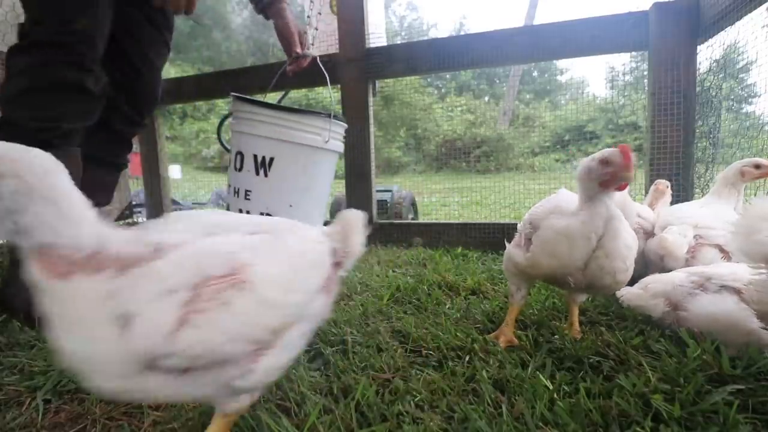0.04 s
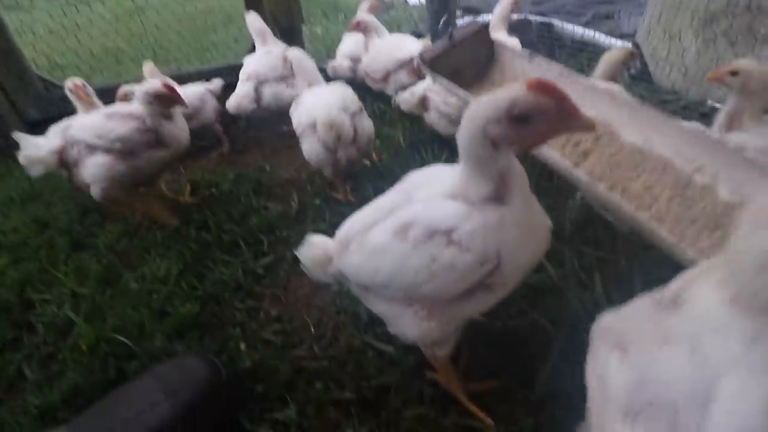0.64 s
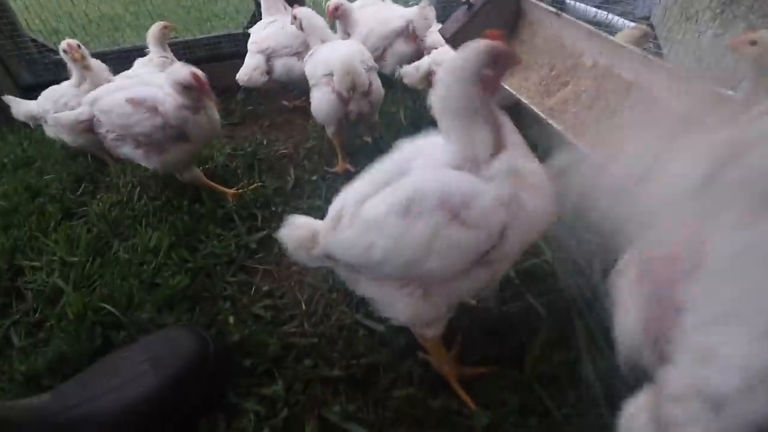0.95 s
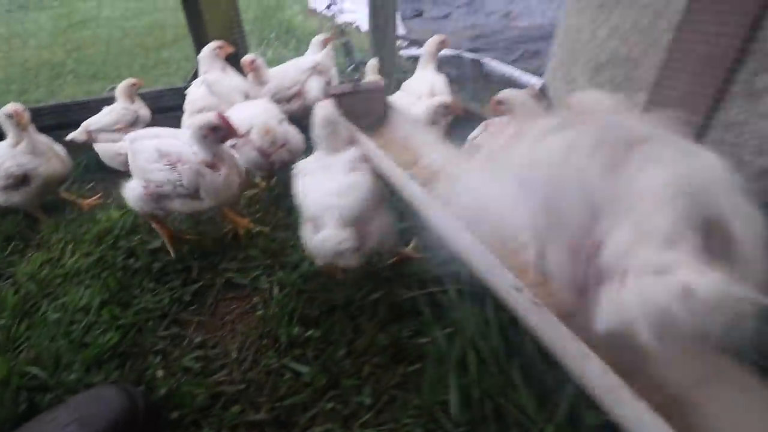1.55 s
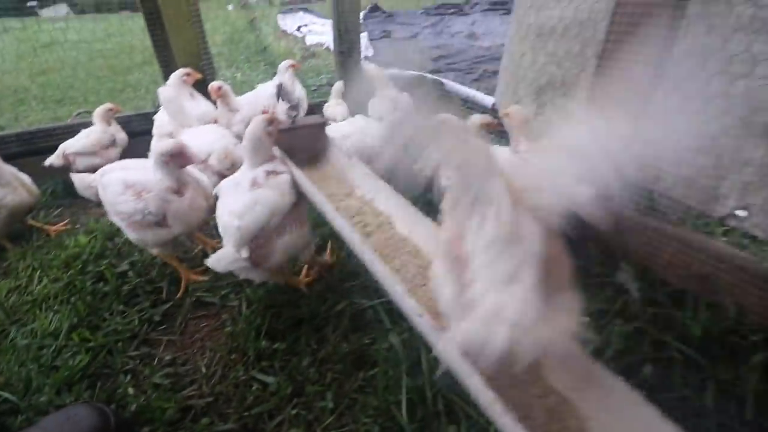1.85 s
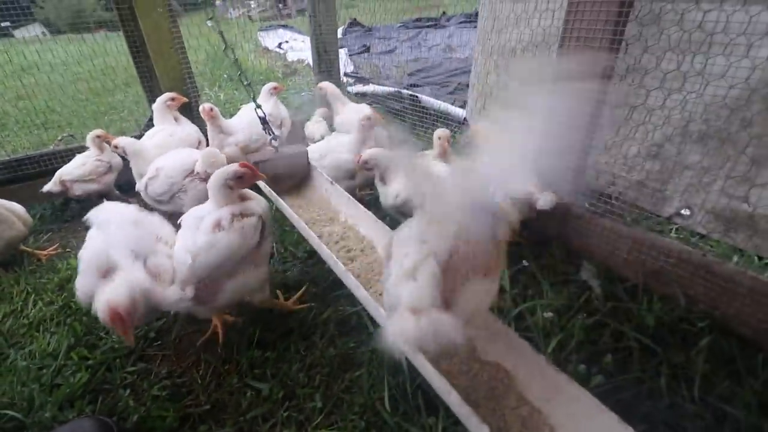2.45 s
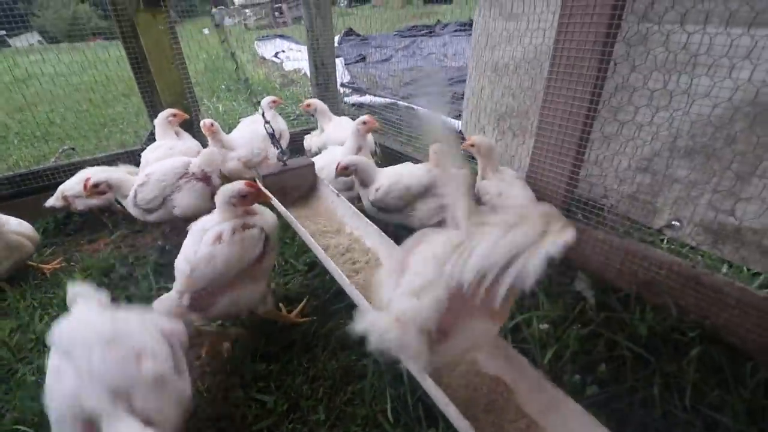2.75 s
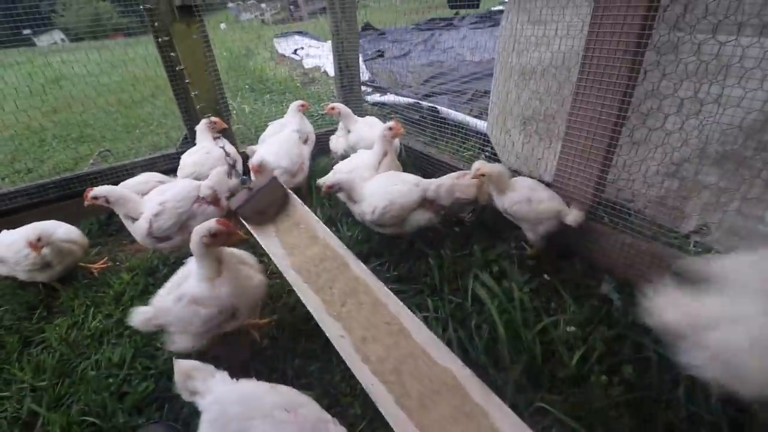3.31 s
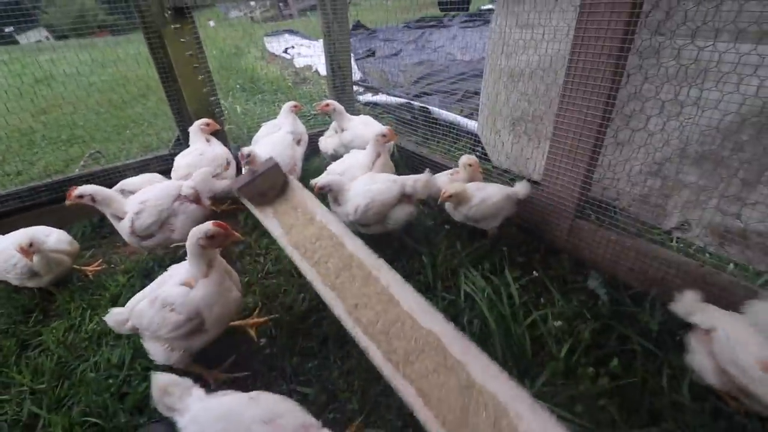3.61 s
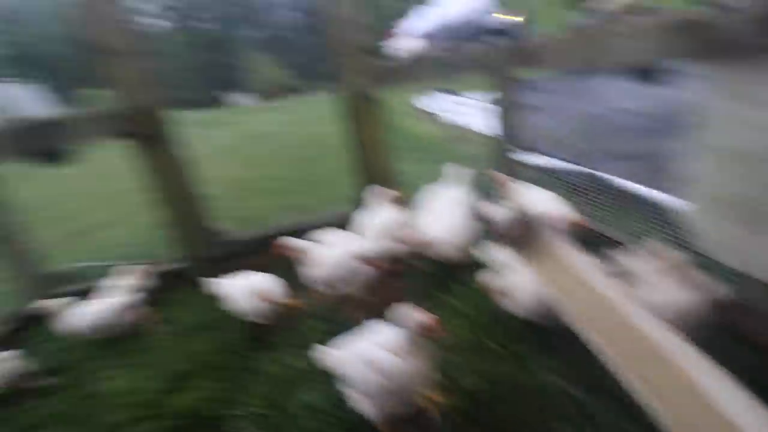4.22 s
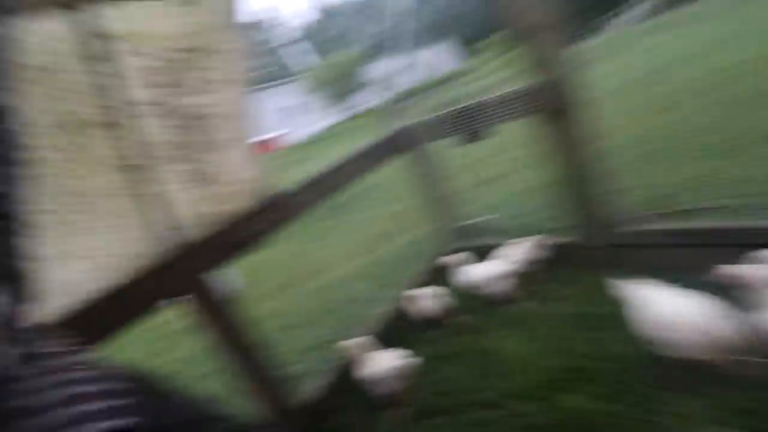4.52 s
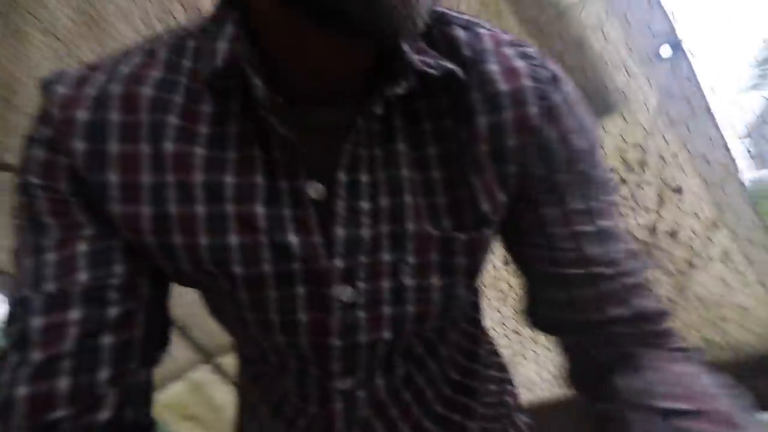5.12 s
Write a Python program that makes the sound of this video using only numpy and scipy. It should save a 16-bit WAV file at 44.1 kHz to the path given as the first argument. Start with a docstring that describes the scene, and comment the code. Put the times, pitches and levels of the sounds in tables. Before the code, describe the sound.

A flock of young chickens peeps constantly in a small outdoor pen, their short falling whistles often breaking into raspy clucks. One bird flaps close by in bursts, puffing low thumps of air on the microphone, with feather swishes and light knocks on a feed trough. Two brief trills come midway. Near the end the microphone rumbles as it swings round, over soft outdoor air and rustling grass.

```python
"""A flock of young chickens peeps and clucks round a feed trough in a small pen on grass.
Each peep is a falling whistle; in startled birds the voice breaks into a low, raspy cluck. Two birds trill.
One flaps past close by: its wings puff air on the microphone, feathers swish, and feet and wings knock
on the trough. The pen's panels add a short echo. Behind it all are outdoor air and rustling grass,
and near the end the camera is swung round and rumbles."""
import sys
import numpy as np
from scipy import signal
from scipy.fft import rfft, irfft
from scipy.io import wavfile
from scipy.ndimage import uniform_filter1d, minimum_filter1d, map_coordinates

SR = 44100
rng = np.random.default_rng(int(sys.argv[2]) if len(sys.argv) > 2 else 0)


def pcm_store(signal):
    """Save signal as 16-bit PCM."""
    levels = np.round(np.clip(np.atleast_2d(signal), -1, 1) * 32767)
    wavfile.write(sys.argv[1], SR, levels.astype(np.int16).T)


N = 232074
T = np.arange(N) / SR
PEEP_BOOST_DB = 2.1  # added to the peeps of the nearby birds

# wing beats: t/s, puff level/dB, swirl rate/Hz, feather level/dB
WING_BEATS = [(.826, -14, 69.4, -34.5), (.913, 5, 54.8, -33), (1.016, 8, 53.2, -44.5),
              (1.13, -7.5, 47.5, -61), (1.495, -14, 60.3, -46), (1.559, -8, 46.4, -33.5),
              (1.629, -14, 59, -60), (1.924, -21, 43.6, -38), (2.047, -8, 47, -62),
              (2.177, -19.5, 47.8, -40.5), (2.318, -9.5, 39.7, -39.5), (3.278, -16.5, 60, -23.5),
              (3.369, -19.5, 82.6, -23), (4.538, -17.5, 60.3, -56)]
# tone colour of brushing feathers: f/Hz, level/dB
FEATHER_COLOUR = [(100, -2.5), (500, 7.5), (1300, 8), (2500, -2.5), (4300, -2), (7000, -15), (12000, -20),
                  (16000, -24)]
# tone colour of the air hissing in a hoarse call: f/Hz, level/dB
BREATH_COLOUR = [(400, -22.5), (1200, 1), (3000, 6.5), (4500, -8.5), (7000, -28.5), (15000, -32.5)]
# how well throat and beak let overtones (multiples of the pitch) through: f/Hz, gain/dB
THROAT_FILTER = [(2300, -11), (3100, -5), (4000, -19), (5200, -25), (7000, -31), (14000, -46)]


def undb(db):
    """Turn decibels into a factor to multiply by."""
    return 10 ** (np.asarray(db) / 20)


def unit(x):
    """Scale to an average strength (rms) of 1."""
    return x / np.sqrt(np.mean(x ** 2) + 1e-18)


def add(track, start, sound):
    """Mix a sound in at its start time in seconds."""
    i = max(int(start * SR), 0)
    part = sound[:max(N - i, 0)]
    track[i:i + len(part)] += part


def noise(colour, n=N):
    """Noise of strength 1 with a given tone colour."""
    hz, db = np.transpose(colour)
    all_hz = np.arange(n // 2 + 1) * SR / n
    gain = undb(np.interp(np.log(all_hz + 1), np.log(hz), db))
    return unit(irfft(rfft(rng.standard_normal(n)) * gain, n))


def wander(n, rate):
    """A smooth random wobble, about 1 in size, that changes `rate` times a second."""
    place = np.arange(n) * rate / SR
    points = rng.standard_normal(int(place[-1]) + 2)
    return map_coordinates(points, [place], order=2, mode="nearest")


def progress(length):
    """A ramp, called u below, from 0 to 1 over `length` seconds."""
    return np.linspace(0, 1, max(int(length * SR), 20))


def edges(u, length, rise, fall):
    """Fade in over `rise` seconds and out over `fall` seconds."""
    fade_in = np.sin(np.pi / 2 * np.clip(u * length / rise, 0, 1))
    fade_out = np.sin(np.pi / 2 * np.clip((1 - u) * length / fall, 0, 1))
    return fade_in * fade_out


def look_up(x, table):
    """Read a two-column table at x, joining its rows with straight lines."""
    return np.interp(x, *np.transpose(table))


def outdoor_air():
    """The soft, wavering rush of the open air."""
    # tone colour: f/Hz, level/dB
    air_colour = [(30, -55), (100, 10.5), (200, -6), (500, -17), (1150, 0.5), (1600, -9), (2600, -12),
                  (4500, -11), (6500, -27.5), (10000, -25.5), (16000, -32)]
    return undb(-44 + wander(N, 5.4)) * noise(air_colour)


def grass_rustle():
    """Feet and clothes brush through the grass."""
    # strength of the brushing: t/s, level/dB
    brushing = [(.05, -46.5), (1.42, -45.5), (1.52, -25.5), (1.75, -48.5), (2.0, -42.5), (2.65, -40),
                (3.08, -42.5), (3.45, -25.5), (3.65, -41.5), (4.7, -43.5), (4.93, -33.5), (5.1, -41.5)]
    # tone colour: f/Hz, level/dB
    rustle_colour = [(60, -14), (170, 8), (450, -1.5), (800, -3), (1250, -4), (2200, -6.5), (4500, -22.5),
                     (7000, -26), (16000, -41.5)]
    return undb(look_up(T, brushing) + 4.53 * wander(N, 90)) * noise(rustle_colour)


def camera_rumble():
    """The camera rumbles as it moves through the air."""
    # strength of the rumble: t/s, level/dB
    swings = [(.35, -47.5), (1.0, -19.5), (1.35, -38), (2.3, -30), (2.95, -35), (4.05, -34), (4.2, -24),
              (4.7, -28.5), (4.83, -12), (4.98, -8), (5.04, -20), (5.26, -26.5)]
    # tone colour: f/Hz, level/dB
    rumble_colour = [(12, -27), (28, 1.5), (60, -10), (100, -11), (200, -18.5), (400, -34), (1000, -43),
                     (3000, -108)]
    return undb(look_up(T, swings) - 2.5) * noise(rumble_colour)


def pen_echo(sound, echo_db=-15.5, ring_s=0.083):
    """The sound plus its quickly dying bounces off the panels and roof."""
    t = np.arange(SR // 2) / SR
    echoes = rng.standard_normal(len(t)) ** 3 * undb(-60 * t / ring_s) * (t > .004)
    echoes = signal.sosfilt(signal.butter(2, 5000, fs=SR, output="sos"), echoes)
    voice_gain = np.abs(rfft(echoes))[500:1750]  # 1000 to 3500 Hz, where the birds call
    echoes /= np.sqrt(np.mean(voice_gain ** 2))
    return sound + undb(echo_db) * signal.fftconvolve(sound, echoes)[:N]


def trough_knocks(ring_cycles=13, contact_s=0.00028):
    """Feet and wings hit the trough: a click and a few tones that die away fast."""
    # knocks: t/s, level/dB, main f/Hz, click level within the knock/dB
    hits = [(.862, -13.5, 900, -32), (1.236, -26.5, 790, -30), (1.296, -26, 840, -28),
            (1.32, -33, 800, -10), (1.514, -24, 420, -9), (1.541, -24.5, 557, -20),
            (1.594, -30.5, 770, -14), (3.027, -13.5, 628, -14), (3.129, -31, 674, -18),
            (3.174, -22.5, 343, -22), (3.318, -36, 610, 4), (3.362, -19, 418, -9), (3.406, -32, 1260, 23.5),
            (3.462, -13.5, 2460, -7), (4.227, -26, 1540, -17), (4.811, -28.5, 640, -17),
            (5.006, -17, 1320, -10.5)]
    # tones the trough rings with: multiple of the main f, level/dB
    tones = [(.42, -2), (.78, 4.5), (1.15, 9.5), (2.05, -7), (3.6, -51)]
    out, t = np.zeros(N), np.arange(SR // 8) / SR
    click_noise = noise(FEATHER_COLOUR)
    build_up = 1 - np.exp(-t / contact_s)  # feet and wings are soft
    for start, db, main_hz, click_db in hits:
        fade_db = -60 * t * main_hz / ring_cycles
        ring = sum(undb(tone_db + fade_db) * np.sin(2 * np.pi * multiple * main_hz * t)
                   for multiple, tone_db in tones)
        click = np.roll(click_noise, -int(start * SR))[:len(t)] * undb(click_db - 60 * t / 0.0077)
        add(out, start, undb(db + 5) * (ring * build_up + click))
    return out


def feather_swishes(lag_s=0.0346, swish_s=0.019):
    """Feathers scrape in quick, grainy strokes, after each wing beat and against grass and wire."""
    # feet and feathers on grass and wire: t/s, length/s, level/dB
    scrapes = [(0.933, 0.0043, -16), (1.04, .012, -32.5), (1.097, 0.006, -35), (1.203, .014, -38.5),
               (1.506, 0.025, -26.5), (2.011, 0.031, -41.5), (2.133, 0.0067, -32.5), (2.679, 0.032, -41.5),
               (3.144, 0.12, -38.5), (3.282, 0.0056, -22), (3.762, 0.022, -41), (4.808, 0.022, -36.5),
               (4.942, 0.068, -39)]
    wings = [(beat + lag_s, swish_s, feather_db) for beat, _, _, feather_db in WING_BEATS]
    strokes = np.zeros(N)
    for start, length, db in wings + scrapes:
        u = progress(length)
        add(strokes, start, undb(db + 10 * (1 - u)) * edges(u, length, rise=0.0045, fall=0.0035))
    return strokes * noise(FEATHER_COLOUR) * undb(5.2 * wander(N, 700) - 1.5)


def wing_puffs(gust_s=.085):
    """Each wing beat rolls a few slow, uneven swirls of air over the microphone."""
    out, u = np.zeros(N), progress(gust_s)
    for beat, db, swirl_hz, _ in WING_BEATS:
        uneven_hz = swirl_hz * (1 + 0.31 * wander(len(u), 123.3))
        phase = 2 * np.pi * (np.cumsum(uneven_hz) / SR + rng.random())
        swirls = np.sqrt(2) * np.sin(phase) + 0.11 * wander(len(u), 641.8)
        add(out, beat - gust_s / 2, undb(db) * swirls * np.sin(np.pi * u) ** 2)
    return out


def voice_phase(hz, jitter):
    """How far the thin skin in a bird's voice box is through its cycles, which are never quite even."""
    return 2 * np.pi * np.cumsum(hz * (1 + jitter * wander(len(hz), 580.7))) / SR


def hoarseness(when):
    """How raspy the flock's voices are at a given moment, in dB."""
    # startled birds get hoarse: t/s, rasp level/dB
    alarm = [(.1, -18), (.55, -4), (.73, -10), (1.25, -23), (1.45, 4), (1.65, -8), (1.75, -44), (2.12, -8),
             (2.34, -2.5), (2.8, -13.5), (3.9, -1), (4.55, -35), (4.75, -5), (5.2, -11)]
    return look_up(when, alarm)


def whistle(hz, rasp_db, overtone_step_db=7.5):
    """A strong tone with weak overtones; rasp makes the voice flutter and adds hiss."""
    phase, n = voice_phase(hz, jitter=.02), len(hz)
    wave = np.sin(phase)
    for k in range(2, 5):
        wave += undb(look_up(k * hz, THROAT_FILTER) - overtone_step_db * (k - 2)) * np.sin(k * phase)
    flutter = wander(n, 1500) * np.sin(phase) + wander(n, 1500) * np.cos(phase)
    return np.sqrt(2) * wave + undb(rasp_db) * unit(flutter + noise(BREATH_COLOUR, n))


def peep(length, top_hz, end_hz, db, loudest_at, rasp_db):
    """A whistle that peaks in pitch, swells as it slides down, then fades."""
    top_at, arc = .1, 1.45  # highest pitch a tenth of the way in; bend of the slide in radians
    u = progress(length)
    slide = (np.sin(arc * (u - top_at)) / np.sin(arc * (1 - top_at))) ** 2
    hz = top_hz * (end_hz / top_hz) ** slide * (1 + .012 * wander(len(u), 130))
    swell_db = np.interp(u, [0, np.clip(loudest_at, .05, .95), 1], [-12, 0, -6.5])
    wave = whistle(hz, rasp_db) * undb(db + swell_db + 2 * wander(len(u), 267))
    return wave * edges(u, length, rise=0.0035, fall=0.0048)


def cluck(from_hz, length, hz, db, overtone_db, rasp_db):
    """The voice drops suddenly, then sinks towards its lowest note as it fades and grows raspier."""
    break_s, sink_s, lowest_hz = 0.00181, 0.046, 958.6
    fade_db_per_s, rasp_db_per_s = 241, 118
    u = progress(length + 0.0058)
    t = np.arange(len(u)) / SR
    sinking_hz = lowest_hz + (hz - lowest_hz) * np.exp(-t / sink_s)
    pitch = sinking_hz + (from_hz - hz) * np.exp(-t / break_s)
    phase = voice_phase(pitch, jitter=0.04)
    wave = np.sqrt(2) * (np.sin(phase) + undb(overtone_db) * np.sin(2 * phase))
    for k in range(3, 6):
        wave += undb(look_up(k * pitch, THROAT_FILTER) - 15.5) * np.sin(k * phase)
    rasp = undb(rasp_db + rasp_db_per_s * t)
    wave += rasp * undb(-7) * noise(BREATH_COLOUR, len(u))
    # unequal cycles add rough tones halfway between the multiples of the pitch
    for k, half_db in enumerate([-10, 0, -25, -22]):
        strength = rasp * undb(half_db) * (1 + 0.55 * wander(len(u), 425))
        wave += strength * np.sin((k + .5) * phase + 0.5 * wander(len(u), 395))
    return wave * undb(db - fade_db_per_s * t) * edges(u, length, rise=0.0061, fall=0.0031)


def far_peeps(count=90):
    """Fainter birds peep at the back of the pen; the deepest slides break into clucks."""
    out = np.zeros(N)
    for k, (when, height, span, distance, slide) in enumerate(rng.random((count, 5))):
        start, length = (k + when) / count * N / SR, .04 + .04 * span
        top_hz, drop = 2400 + 1300 * height, .14 + .22 * slide
        end_hz, far_db = top_hz * (1 - drop), -6 * distance
        add(out, start, peep(length, top_hz, end_hz, db=far_db - 36.5, loudest_at=0.42, rasp_db=-5))
        if drop > .31:
            low_note = cluck(end_hz, length / 2, hz=1397, db=far_db - 39.5, overtone_db=-11, rasp_db=-16)
            add(out, start + length, low_note)
    return out


def trills(unevenness=.13):
    """A held, breathy whistle whose pitch dips some forty times a second, louder on each way down."""
    # trills: t/s, length/s, warble rate/Hz, top f/Hz, depth of dip/Hz, level/dB
    calls = [(2.316, 0.284, 40.7, 3050, 627, -24.5), (2.782, 0.12, 37.7, 2774, 760, -24.5)]
    out = np.zeros(N)
    for start, length, rate, top_hz, dip_hz, db in calls:
        u = progress(length)
        turns = np.cumsum(rate * (1 + unevenness * wander(len(u), 90.8))) / SR
        dip = (1 - np.abs(np.sin(np.pi * turns))) * (.85 + .3 * wander(len(u), 40))
        hz = (top_hz - dip_hz * dip) * (1 + .03 * wander(len(u), 450))
        wave = whistle(hz, rasp_db=-6)
        throb_db = -4 * np.sin(2 * np.pi * turns) + 2 * wander(len(u), 204)
        add(out, start, wave * undb(db - 2 + throb_db) * edges(u, length, rise=0.0033, fall=0.0091))
    return out


def startled_clucks():
    """A startled bird's peep slides down until it breaks into its low voice."""
    # the peep: t/s, length/s, top f/Hz, end f/Hz, level/dB, loudest point/share of length;
    # then its cluck: length/s, f/Hz, level/dB, overtone level/dB, rasp level/dB
    calls = [(0.306, 0.051, 3600, 1560, -35, 0.6, 0.015, 1155, -26, -14, -15),
             (0.444, 0.054, 3690, 2050, -32.5, 0.85, 0.048, 1440, -24, -6, -8.5),
             (0.525, 0.051, 3170, 1388, -19.5, 0.55, 0.018, 1305, -8, -16.5, -11),
             (0.625, 0.044, 3400, 1610, -27, 0.65, 0.025, 1210, -11.5, -24, -7.5),
             (0.69, 0.029, 4480, 3710, -30, 0.7, 0.034, 1970, -20.5, -6.5, 1.5),
             (0.74, 0.045, 2670, 1910, -13, 0.88, 0.01, 1260, -6, -17, -16),
             (1.068, 0.022, 2690, 2130, -50, 1, 0.055, 1796, -30.5, -22, -29),
             (1.189, 0.054, 3090, 1944, -29, 1, 0.034, 1737, -22.5, -2.5, -29),
             (1.43, 0.028, 2695, 1975, -18.5, 0.78, 0.023, 1309, -14, -3, -5.5),
             (1.624, 0.023, 2940, 2064, -19, 0.79, 0.026, 1367, -15.5, -1.5, -2),
             (1.839, 0.054, 3030, 1676, -30.5, 0.75, 0.026, 1199, -14.5, -25, -9),
             (2.06, 0.055, 2944, 1934, -22.5, 1, 0.035, 1760, -16.5, -4, -22),
             (2.319, 0.045, 2980, 1930, -19, 0.8, 0.015, 1275, -12.5, -17, -6),
             (2.515, 0.046, 3060, 2630, -28, 0.43, 0.0088, 2050, -19, -11, -24),
             (3.197, 0.041, 3280, 3130, -12, 0.48, 0.0052, 1814, -0.5, -21, -9),
             (3.416, 0.064, 2726, 1773, -21, 0.34, 0.036, 1266, -12, -22, -9.5),
             (3.896, 0.045, 3110, 2160, -24.5, 0.83, 0.0316, 1970, -18, -18, -12),
             (4.061, 0.028, 2890, 2370, -26, 0.47, 0.052, 1910, -15.5, -14.5, -9),
             (4.12, 0.043, 3380, 1736, -22, 0.84, 0.017, 1169, -11.5, -15, -12),
             (4.238, 0.029, 3120, 2230, -25.5, 0.57, 0.045, 1830, -9.5, -16.5, -16.5),
             (4.288, 0.048, 2470, 1910, -32, 0.99, 0.024, 1180, -15.5, -16, -13.5),
             (4.725, 0.028, 2510, 2260, -19, 1, 0.02, 1337, -19.5, -10, 3.5),
             (4.85, 0.041, 3300, 1796, -24.5, 1, 0.026, 1350, -21, -20, -1.5),
             (4.991, 0.036, 3180, 2353, -23.5, 0.81, 0.037, 1450, -20, -4.5, -2),
             (5.094, 0.019, 2490, 2060, -29.5, 0.81, 0.026, 1770, -26.5, -9, -11)]
    out = np.zeros(N)
    for start, length, top_hz, end_hz, db, loudest_at, *low_voice in calls:
        high_note = peep(length, top_hz, end_hz, db, loudest_at, rasp_db=hoarseness(start) - 4.5)
        add(out, start, undb(PEEP_BOOST_DB) * high_note)
        add(out, start + length - .001, cluck(end_hz, *low_voice))
    return out


def near_peeps():
    """The birds round the trough all peep across each other."""
    # peeps: t/s, length/s, top f/Hz, end f/Hz, level/dB, loudest point/share of length
    calls = [(0.046, 0.049, 2750.0, 2060, -27.5, 0.47), (0.184, 0.057, 2500, 2120, -40, 0.37),
             (0.364, 0.054, 2640, 1970, -34.5, 0.8), (0.586, 0.051, 3550.0, 3070.0, -35.5, 0.54),
             (0.796, 0.064, 2730.0, 1360, -30, 0.41), (1.108, 0.048, 3460, 2650, -43, 0.35),
             (1.286, 0.039, 3700, 3270, -40.5, 0.72), (1.562, 0.046, 2660.0, 2015, -29, 0.5),
             (1.715, 0.033, 2640, 2060.0, -29, 0.3), (1.772, 0.079, 2900, 1810, -28, 0.74),
             (1.919, 0.047, 3200, 2510, -30.5, 0.89), (1.942, 0.071, 3710, 1960, -31, 1),
             (1.985, 0.071, 3700, 2630.0, -33.5, 0.8), (2.143, 0.063, 3790, 3030, -31.5, 0.45),
             (2.182, 0.085, 2850, 2010, -30, 0.69), (2.57, 0.071, 3440.0, 1970, -30.5, 0.89),
             (2.727, 0.065, 3160, 2540, -32, 0.36), (2.769, 0.039, 2506, 1946, -17.5, 0.55),
             (2.969, 0.037, 2850, 2390.0, -32.0, 0.7), (3.142, 0.054, 3590, 2080.0, -27.5, 1),
             (3.286, 0.068, 2670, 1990, -30, 0.4), (3.592, 0.07, 3450, 2110, -36.5, 0.27),
             (3.716, 0.035, 3450, 3500, -29.5, 0.55), (3.755, 0.045, 3210.0, 2490, -30.5, 0.31),
             (3.949, 0.085, 3460, 1970, -26.5, 1), (4.313, 0.13, 2650.0, 2020, -34, 0.84),
             (4.453, 0.071, 3160.0, 1740, -31.5, 0.48), (4.543, 0.057, 2985, 2055, -22, 0.14),
             (4.588, 0.088, 3680, 2400, -31.5, 0.7), (4.668, 0.068, 2810.0, 2050, -31, 0.37),
             (4.753, 0.066, 3200, 1866, -23, 0.72), (5.028, 0.034, 2790.0, 1736, -23.0, 0.61),
             (5.07, 0.03, 2800, 2190.0, -31, 1), (5.093, 0.073, 3500, 2700, -35.5, 0.27),
             (5.143, 0.029, 2510, 2210, -25.5, 0.49), (5.147, 0.12, 2560, 2090, -33.5, 0.58)]
    out = np.zeros(N)
    for start, *shape in calls:
        add(out, start, undb(PEEP_BOOST_DB) * peep(*shape, rasp_db=hoarseness(start) - 5.5))
    return out


def scene():
    """The flock in its echoing pen, with wing puffs and background, in one channel."""
    voices = near_peeps() + startled_clucks() + trills() + far_peeps()
    flock = pen_echo(voices + feather_swishes() + trough_knocks())
    return (flock + wing_puffs() + camera_rumble() + grass_rustle() + outdoor_air())[None]


def record(dry, limit=.5, top_hz=15900):
    """Strong gusts turn the volume down; short peaks are flattened and the highest treble is cut."""
    loudness = uniform_filter1d(np.abs(dry), int(0.061 * SR))
    held_gain = minimum_filter1d(limit / np.maximum(loudness, limit), int(0.052 * SR))
    smooth_gain = uniform_filter1d(held_gain, int(0.022 * SR))
    limited = np.clip(dry * smooth_gain, -1, 1)
    return signal.sosfilt(signal.ellip(10, .2, 80, top_hz, fs=SR, output="sos"), limited)


dry = scene()
out = record(dry)
pcm_store(out)
```